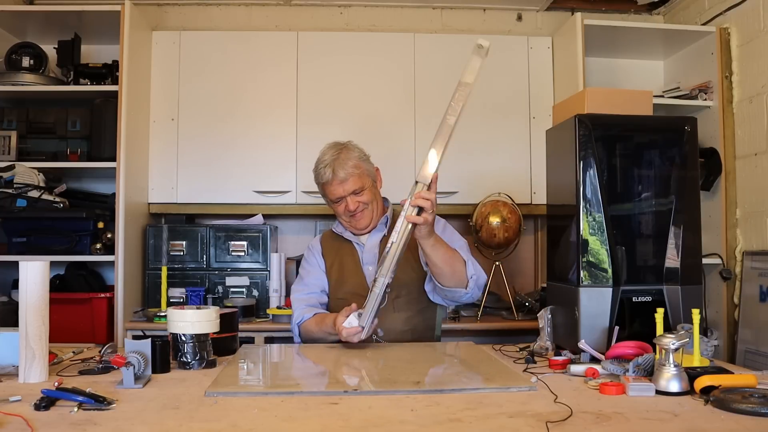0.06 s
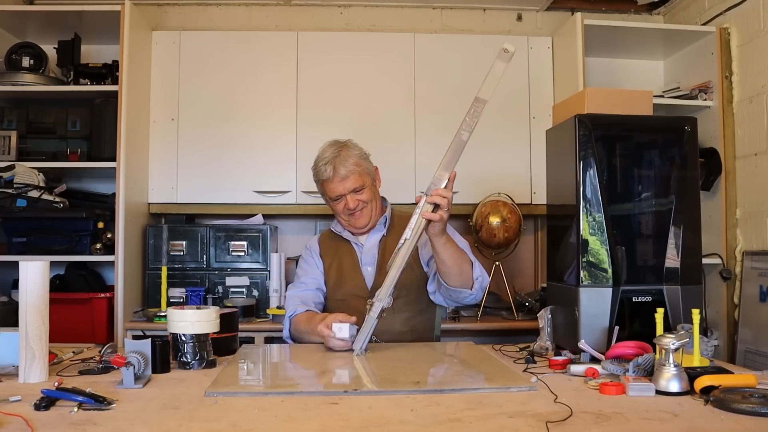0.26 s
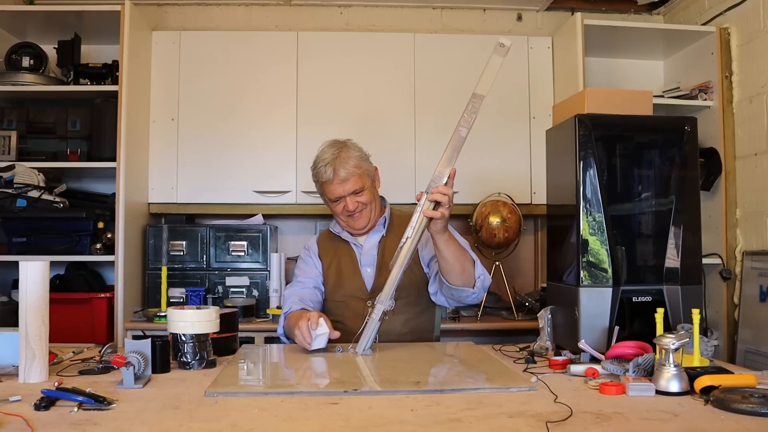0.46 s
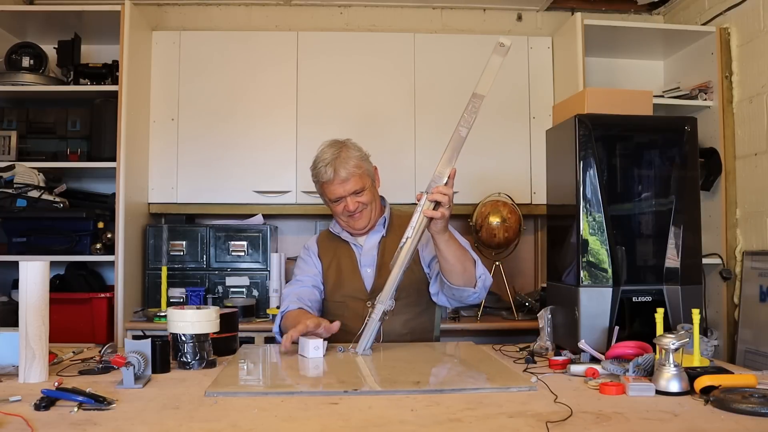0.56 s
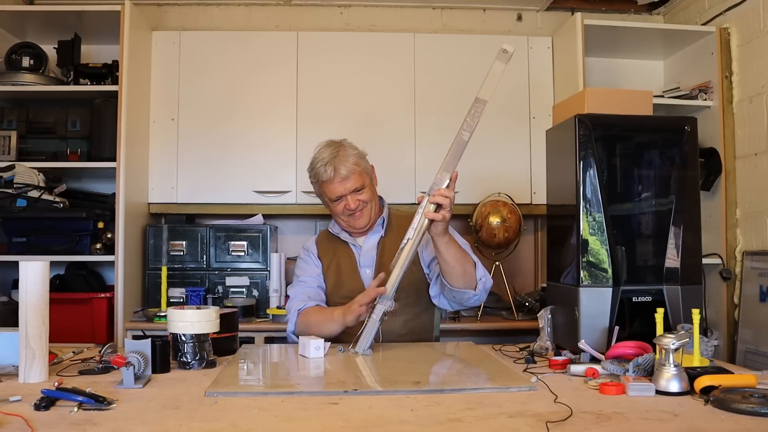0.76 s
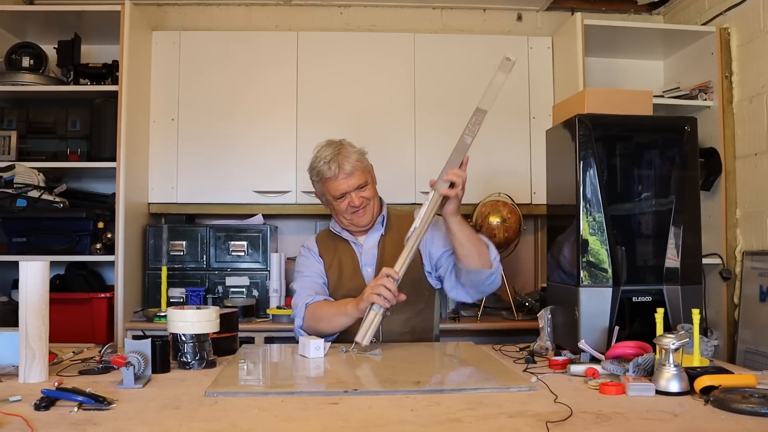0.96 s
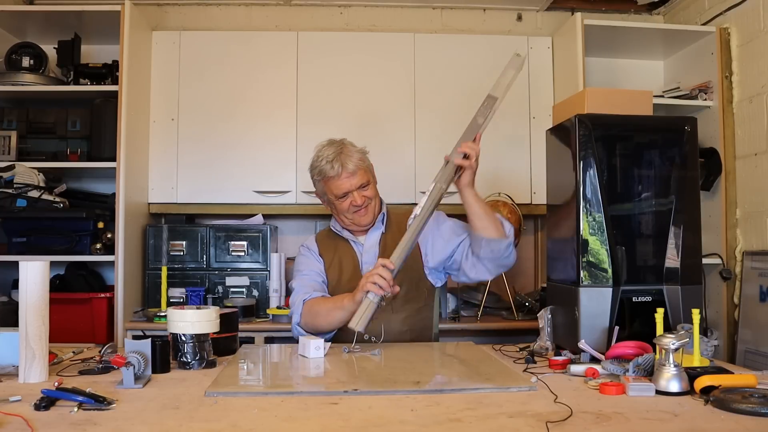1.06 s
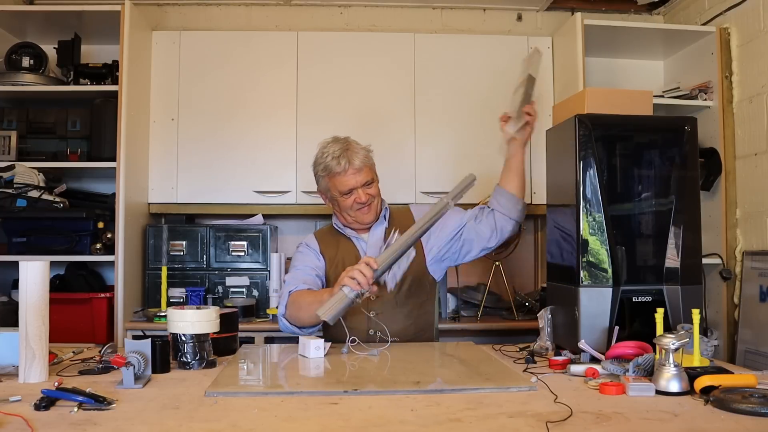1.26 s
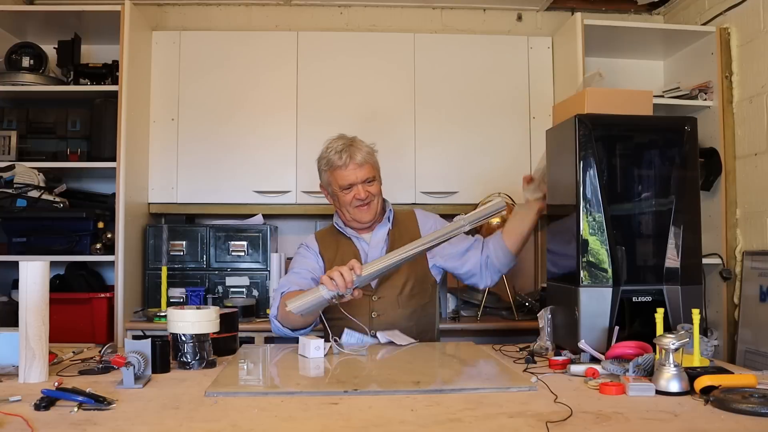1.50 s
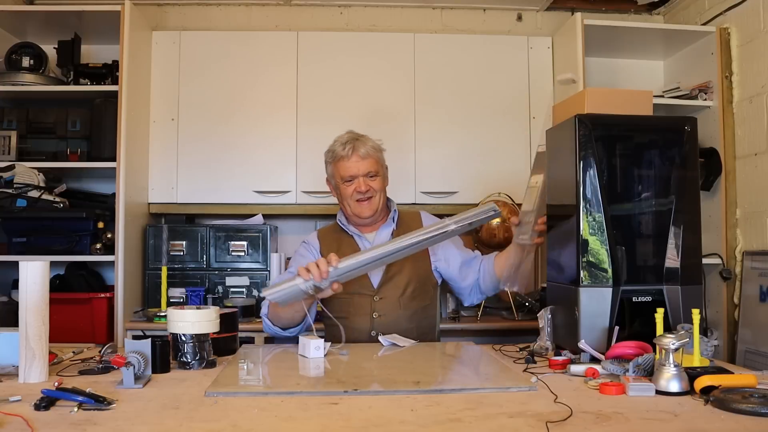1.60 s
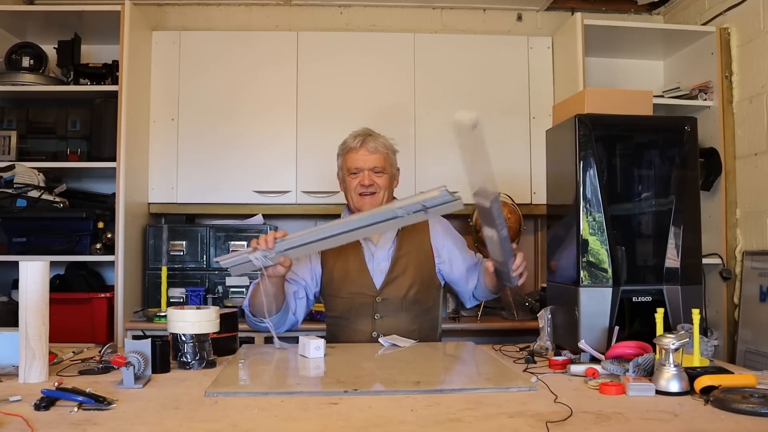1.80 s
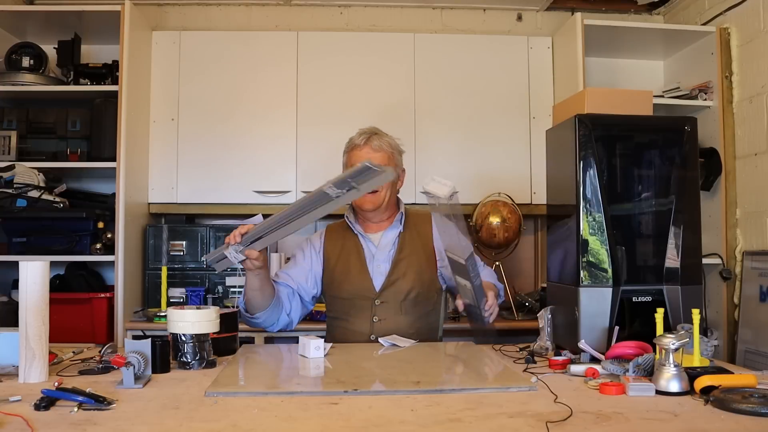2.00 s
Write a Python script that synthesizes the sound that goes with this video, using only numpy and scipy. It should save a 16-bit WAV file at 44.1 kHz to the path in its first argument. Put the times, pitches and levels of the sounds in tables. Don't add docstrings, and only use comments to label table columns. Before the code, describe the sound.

Plastic slats clatter, starting with a hard crack and quick rebounds at 0 s, then a tiny metallic ping. Sharp clicks at 0.3-0.55 s surround the heaviest bench knock near 0.49. Rattles, squeaks and hollow card pops follow to 0.8, then a lull. Scrapes and pops return at 1.05-1.3, a firm clack at 1.53, then sparse soft rustles. Close microphone, small dry garage, hardest hits clipped.

```python
import sys
import numpy as np
from scipy import signal
from scipy.fft import rfft, irfft
from scipy.io import wavfile
from scipy.ndimage import uniform_filter1d

SR = 44100
rng = np.random.default_rng(int(sys.argv[2]) if len(sys.argv) > 2 else 0)


def put_to_file(sound):
    columns = np.atleast_2d(sound).T
    safe = np.clip(columns, -1, 1)
    whole_steps = np.round(safe * 32767)
    wavfile.write(sys.argv[1], SR, whole_steps.astype(np.int16))


def magnitude_from_level(level_db):
    exponent = np.asarray(level_db, float) / 20
    return 10 ** exponent


N = 90272

# pitch in Hz, level in dB, t60 in seconds (at least 1/30 is used).
FITTING_MODES = [(1225, -9.5, 0.7), (1890, 1, 0.32), (3220, 9, 0.24), (5188, 12, 0.08), (5900, 0, -0.04),
                 (7500, -8, -0.22), (8540, 4, -0.45), (8380, 3.5, 0.06), (10070, 8.5, -0.36),
                 (13300, 6, -0.5)]
# start in seconds, peak in dB, favoured pitch in Hz, length in seconds.
FITTING_CHATTERS = [(0, -7.5, 10100, 0.0038), (.01, -37, 10000, 0.056), (0.09, -17, 6000, 0.0014),
                    (0.406, -15, 1940, 0.0082), (0.61, -27, 8340, 0.036), (.63, -40, 8300, .06),
                    (0.653, -24.5, 1220, 0.06), (0.701, -28, 11100, .018), (0.746, -11, 8050, 0.017),
                    (0.763, -11.5, 7000, 0.041), (0.792, -31, 7760, 0.055), (1.128, -24, 5200, 0.032),
                    (1.14, -20.5, 5200, 0.016), (1.416, -32, 5000, 0.043)]
# pitch in Hz, level in dB, t60 in seconds.
BUNDLE_MODES = [(1943, 0, 0.053), (2300, -12.5, 0.31), (2587, 10.5, 0.042), (2910, 11, 0.033),
                (3610, -15, 0.22), (4110, -18.5, 0.18), (4820, 1, 0.11), (4800, 3, 0.06), (6700, 2, 0.34),
                (6920, -14, 0.17), (8100, -3, 0.089)]
# start in seconds, peak in dB, contact in seconds.
BUNDLE_BLOWS = [
    (.0002, -2, 0.000051),
    (.004, -15, 0.00006),
    (.012, -8.5, 0.00014),
    (.0215, -8, 0.00018),
    (.4065, -6, 0.00016),
    (.4872, -6, 0.00027),
    (1.5325, -14, 0.000065),
]
# start in seconds, peak in dB, centre in Hz, t60 in seconds.
EARLY_CLICKS = [(.0003, 3, 2450, 0.0062), (.0044, -3.5, 4580, 0.085), (.0985, -24, 7500, .01),
                (.2405, -27, 1790, .016), (.258, -18.5, 2320, 0.016), (.3025, -11.5, 2520, 0.028),
                (.3188, 1.5, 4100, 0.0079), (.319, -41, 13600, 0.0082), (.407, -8.5, 1890, 0.061),
                (.4325, -11, 7000, 0.0092), (.439, -5.5, 13800, 0.0092), (.4395, -10, 7040, 0.0072),
                (.447, -9, 11700, 0.0074), (.4525, -14, 7500, .01), (.4872, -3.5, 2600, .02),
                (.4958, -6, 3720, 0.031), (.496, -2, 7000, 0.018), (.5245, -8.5, 7800, 0.015),
                (.525, -15, 14000, .01), (.532, -11, 10500, 0.008), (.538, -12, 7800, 0.016),
                (.6275, -15, 6700, 0.037), (.651, -27, 6000, 0.0079), (.6885, -20, 3930, .008),
                (.694, -28, 5960, .008), (.7085, -6, 5270, 0.016), (.716, -9, 6500, .015),
                (.781, -10.5, 1580, 0.017), (.7845, -15, 7500, 0.0096), (.803, -24, 6100, .01)]
LATE_CLICKS = [(1.065, -17.5, 3460, 0.031), (1.238, -6, 8200, 0.0093), (1.2385, -7.5, 1480, 0.0076),
               (1.2772, -3, 1427, 0.0073), (1.277, -3.5, 8380, 0.0072), (1.355, -16, 9100, 0.014),
               (1.377, -12, 8840, 0.015), (1.378, -18, 2430, 0.043), (1.5324, 1.5, 3600, 0.018),
               (1.533, -8.5, 2570, 0.013), (1.5444, -6, 2370, 0.013), (1.546, -1.5, 6600, 0.0084),
               (1.711, -22.5, 4750, 0.033), (1.713, -28, 2300, .03), (1.7285, -18, 6100, 0.0056),
               (1.7397, -16, 4000, 0.011), (1.9036, -31, 7550, 0.012), (1.921, -10, 4200, 0.011),
               (1.984, -36, 5000, .03)]
# start in seconds, peak in dB, contact in seconds.
BENCH_KNOCKS = [
    (.0005, -12.5, 0.0011),
    (.39, -14, 0.00063),
    (.4865, 4, 0.00097),
    (.4959, -4, 0.00064),
    (.525, -42, 0.00063),
    (.706, -30, 0.0058),
    (.779, -22, 0.0027),
    (1.278, -32, 0.0032),
]
# pitch in Hz, level in dB, t60 in seconds.
BENCH_MODES = [(140.5, -4, 0.14), (296.5, -7.5, 0.071), (422, 6.5, 0.036), (518, -1.5, 0.067),
               (614, 2.5, 0.056), (750, 1.5, 0.099)]
# peak in seconds, level in dB, rise in seconds, fall t60 in seconds,
# sleeve scrape against slat rustle in dB.
GESTURES = [(.002, -20.5, 0.0057, 0.45, -7), (0.261, -38, 0.097, 0.98, 4), (0.325, -26, 0.025, 0.43, -3),
            (0.409, -20.5, 0.014, 0.43, -5), (0.453, -19.5, 0.08, 0.087, -7.5),
            (0.496, -20.5, 0.017, 0.3, -1), (0.633, -27, 0.061, .2, -2.5), (0.711, -21.5, 0.015, 0.34, 0.5),
            (0.756, -18, 0.018, 0.22, -14), (0.785, -19.5, 0.012, 0.22, -1), (0.828, -31, 0.033, 0.16, 1.5),
            (1.074, -33.5, 0.065, 0.1, 2.5), (1.172, -27.5, 0.14, 0.79, -8), (1.298, -23, 0.047, 0.18, 0.5),
            (1.387, -37, 0.037, 0.55, 2.5), (1.545, -17, 0.016, 0.11, -1.5),
            (1.588, -31.5, 0.023, 0.36, -6), (1.713, -33, 0.011, 0.99, -2.5),
            (1.818, -27.5, 0.04, 0.28, -1), (1.927, -39, 0.022, 0.31, 6), (1.991, -26, 0.028, 0.33, -5.5)]
# pitch in Hz, level in dB per Hz.
RUSTLE = [(1200, 2.5), (2000, 0.5), (3200, 6), (5000, 9), (8300, 12), (10000, 0.5), (15600, -22)]
SCRAPE = [(35, -44), (60, -41), (155, -3), (623, 3), (706, 3), (1200, -1), (1620, -1), (2500, -1.5),
          (3250, -12), (5500, -120)]
# start in seconds, length in seconds, centre in Hz, width in Hz.
SLIDES = [
    (1.178, .06, 2120, 250),
    (1.168, .07, 860, 350),
    (1.283, .06, 900, 900),
    (1.05, 0.23, 11000, 9000),
    (.59, .055, 1500, 900),
    (.645, .15, 1270, 150),
    (.435, .05, 7000, 3000),
    (1.185, .06, 1450, 900),
]
SLIDE_DB = [-21.5, -21.5, -26.5, -39.5, -35.5, -30, -27.5, -28.5]
# start in seconds, peak in dB, contact in seconds.
PINGS = [
    (.093, -5.5, .0001),
    (1.148, -25, 0.00011),
]
# pitch in Hz, level in dB, t60 in seconds.
PING_MODES = [(5150, 1, 0.037), (5200, -7, 0.037), (3600, -11, 0.029)]
# start in seconds, peak in dB, centre in Hz.
POPS = [(0.337, -16.5, 880), (0.388, -19.5, 566), (0.486, -4.5, 790), (.501, -10, 1050), (.513, -22, 770),
        (0.627, -9, 1600), (.633, -11, 1350), (.64, -14, 1290), (0.65, -10.5, 1335), (0.705, -14, 920),
        (.715, -15.5, 1030), (0.746, -14, 1260), (0.778, -10.5, 960), (1.016, -31, 398), (1.067, -16, 860),
        (1.071, -19.5, 506), (1.117, -17.5, 830), (1.151, -11.5, 800), (1.159, -12, 740), (1.191, -19, 810),
        (1.206, -7.5, 940), (1.22, -11.5, 750), (1.237, -6, 840), (1.278, -4.5, 1000), (1.294, -13.5, 550),
        (1.297, -17, 1100), (1.313, -18, 800), (1.319, -23, 484), (1.326, -19.5, 513), (1.755, -24.5, 477)]
# start in seconds, peak in dB, length in seconds.
JOLTS = [
    (0.503, -8, 0.042),
    (0.686, -37, 0.021),
    (0.796, -19, 0.038),
    (1.276, -26, 0.047),
    (1.505, -34, 0.027),
    (1.81, -35, .04),
]
# start in seconds, peak in dB, contact in seconds.
HAND_KNOCKS = [
    (1.5334, -5.5, 0.0015),
    (1.5424, -10, 0.0012),
    (1.59, -17, 0.00076),
    (1.81, -19.5, .003),
    (1.822, -17.5, 0.0027),
    (1.975, -20, 0.0068),
    (1.991, -17, 0.0065),
]
# pitch in Hz, level in dB, t60 in seconds.
HAND_MODES = [(128.5, -12, 0.24), (231, 5, 0.067), (324, -4, 0.13), (445, 4, 0.079), (695, 0, 0.074),
              (930, -20, 0.14)]
# pitch in Hz, t60 in seconds.
ROOM_T60 = [(125, 0.19), (1000, 0.41), (4000, 0.18), (12000, 0.36)]
# pitch in Hz, level in dB per Hz.
FLOOR = [(25, 24), (60, 12), (150, -1.5), (400, 2), (900, -9.5), (2000, -18), (7000, -15), (15000, -24)]


def unit(x):
    return x / np.sqrt(np.mean(x ** 2))


def curve(hz, table):
    table = np.array(table, float)
    return np.interp(np.log(np.maximum(hz, 1)), np.log(table[:, 0]), table[:, 1])


def colour(x, table):
    gain = magnitude_from_level(curve(np.fft.rfftfreq(len(x), 1 / SR), table))
    return unit(irfft(rfft(x) * gain, len(x)))


def ring(x, hz, t60):
    pole = np.exp(2j * np.pi * hz / SR - np.log(1000) / (max(t60, 1e-3) * SR))
    return signal.lfilter([1], [1, -pole], x).imag


def add(out, start, x, db):
    i = int(start * SR)
    out[i:i + len(x)] += (x * magnitude_from_level(db) / np.abs(x).max())[:len(out) - i]


def fittings():
    focus_db_per_octave = 14.5
    out, t = np.zeros(N), np.arange(12000) / SR
    for start, db, favoured_hz, length in FITTING_CHATTERS:
        chatter = rng.standard_normal(len(t)) * np.sin(np.pi * np.clip(t / length, 0, 1))
        sound = 0
        for hz, mode_db, t60 in FITTING_MODES:
            away = abs(np.log2(hz / favoured_hz))
            sound = sound + magnitude_from_level(mode_db - focus_db_per_octave * away) * ring(chatter, hz, max(t60, 1 / 30))
        add(out, start, sound, db)
    return out


def knocks(table, modes):
    out, t = np.zeros(N), np.arange(16384) / SR
    for start, db, contact in table:
        push = np.sin(np.pi * np.clip(t / max(contact, 1e-4), 0, 1))
        sound = 0
        for hz, mode_db, t60 in modes:
            change = rng.standard_normal()
            sound = sound + magnitude_from_level(mode_db + 2.5 * change) * ring(push, hz * (1 + 0.0135 * change), t60)
        add(out, start, sound, db)
    return out


def snaps(table, width, crack_db, slap_db):
    harder_brighter = 0.53
    out, t = np.zeros(N), np.arange(4096) / SR
    for start, db, hz, t60 in table:
        noise = rng.standard_normal(len(t))
        burst = (noise + magnitude_from_level(slap_db) * (t == 0)) * magnitude_from_level(-60 * t / t60)
        body = ring(ring(burst, hz, 1.6 / (width * hz)), hz, 1.68 / (width * hz))
        body = np.diff(body, prepend=0)
        crack = noise * magnitude_from_level(-60 * t / 0.013)
        crack_gain = magnitude_from_level(crack_db + harder_brighter * db)
        add(out, start, body / np.abs(body).max() + crack_gain * crack / np.abs(crack).max(), db)
    return out


def slat_clicks(table):
    return snaps(table, width=0.37, crack_db=-10, slap_db=14)


def walk(rate):
    k = int(SR / rate)
    steps = np.repeat(rng.standard_normal(N // k + 1), k)
    return unit(uniform_filter1d(steps, k)[:N])


def grains():
    per_second, spread_db, largest, flutter_db = 6400, 2.5, 4.0, 1.67
    hit = rng.random(N) < per_second / SR
    size = magnitude_from_level(spread_db * np.minimum(rng.exponential(size=N), largest)) * rng.standard_normal(N)
    return (hit * size + 0.23 * rng.standard_normal(N)) * magnitude_from_level(flutter_db * walk(44.84))


def rustle_and_scrape():
    t, slats, sleeve = np.arange(N) / SR, 0, 0
    for peak, db, rise, fall, scrape_db in GESTURES:
        swell = np.clip(1 + (t - peak) / rise, 0, 1) ** 2
        fade = magnitude_from_level(-120 * np.maximum(t - peak, 0) / fall)
        power = magnitude_from_level(2 * db) * np.where(t < peak, swell, fade)
        slats = slats + power
        sleeve = sleeve + power * magnitude_from_level(2 * scrape_db)
    rustle = colour(grains(), [(600, -60)] + list(RUSTLE))
    scrape = colour(grains(), list(SCRAPE) + [(11000, -26.0)])
    return np.sqrt(slats) * rustle + np.sqrt(sleeve) * scrape


def slides():
    out, t = np.zeros(N), np.arange(N) / SR
    for (start, length, hz, width), db in zip(SLIDES, SLIDE_DB):
        swell = np.sin(np.pi * np.clip((t - start) / length, 0, 1))
        band = ring(ring(grains(), hz, 2.1 / width), hz, 2.1 / width)
        out += magnitude_from_level(db) * np.sqrt(length * SR / N / 2) * unit(swell * band)
    return out


def sleeve_pops():
    t60 = 0.033
    return snaps([(*pop, t60) for pop in POPS], width=0.36, crack_db=-29, slap_db=28)


def jolts():
    out = np.zeros(N)
    for start, db, length in JOLTS:
        count = int(length * SR)
        t = np.arange(count) / count
        add(out, start, np.sin(2 * np.pi * t) * np.sin(np.pi * t), db)
    return out


def room(x):
    tail_db, first_echo_s = -9.5, 0.0041
    t, tail = np.arange(SR // 2) / SR, 0
    for hz in 62.5 * 2 ** np.arange(9):
        edges = [hz / np.sqrt(2), min(hz * np.sqrt(2), SR / 2.1)]
        band = signal.butter(2, edges, "band", fs=SR, output="sos")
        noise = signal.sosfilt(band, rng.standard_normal(len(t)))
        tail = tail + noise * magnitude_from_level(-60 * t / curve(hz, ROOM_T60))
    tail = tail * (t > first_echo_s)
    return x + magnitude_from_level(tail_db) * signal.fftconvolve(x, tail / np.sqrt(np.sum(tail ** 2)))[:N]


def scene():
    dry = fittings() + knocks(BUNDLE_BLOWS, BUNDLE_MODES)
    dry += slat_clicks(EARLY_CLICKS) + slat_clicks(LATE_CLICKS)
    dry += knocks(BENCH_KNOCKS, BENCH_MODES)
    dry += rustle_and_scrape() + slides()
    dry += knocks(PINGS, PING_MODES)
    dry += sleeve_pops()
    dry += knocks(HAND_KNOCKS, HAND_MODES)
    floor = magnitude_from_level(-38.5) * colour(rng.standard_normal(N), FLOOR)
    return (room(dry) + jolts() + floor)[None]


def top_cut(x):
    return signal.sosfilt(signal.butter(12, 15700, fs=SR, output="sos"), x)


def record(dry):
    low_hz, knee_hz, top_db, top_hz, clip_at = 102, 9820, -2.5, 15800, 0.97
    x = signal.sosfilt(signal.butter(3, low_hz, "high", fs=SR, output="sos"), dry)
    below = signal.sosfilt(signal.butter(4, knee_hz, fs=SR, output="sos"), x)
    x = below + magnitude_from_level(top_db) * (x - below)
    x = signal.sosfilt(signal.ellip(8, .2, 60, top_hz, fs=SR, output="sos"), x)
    return top_cut(np.clip(x, -clip_at, clip_at))


dry = scene()
out = record(dry)
put_to_file(out)
```